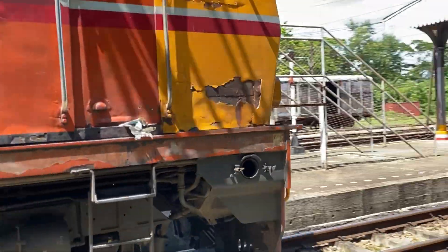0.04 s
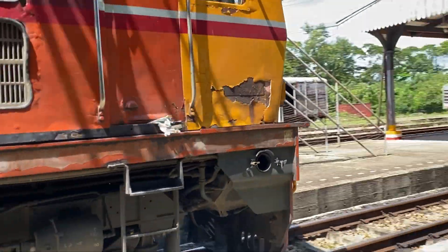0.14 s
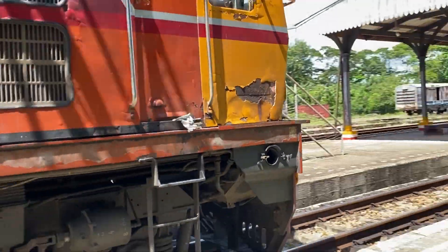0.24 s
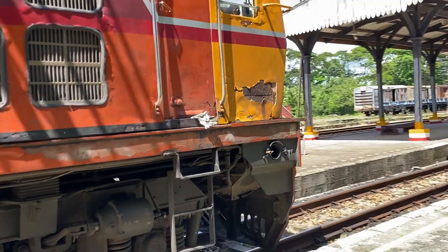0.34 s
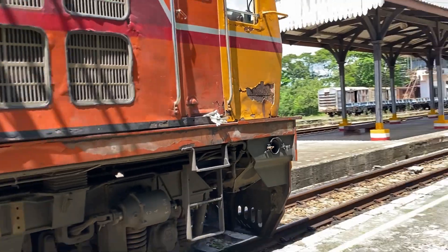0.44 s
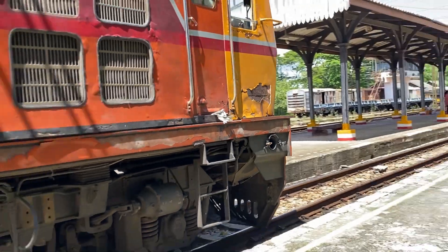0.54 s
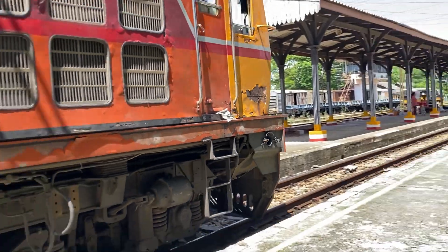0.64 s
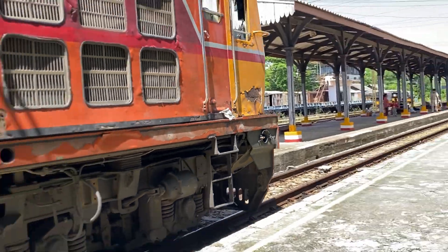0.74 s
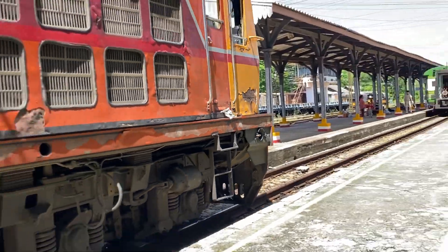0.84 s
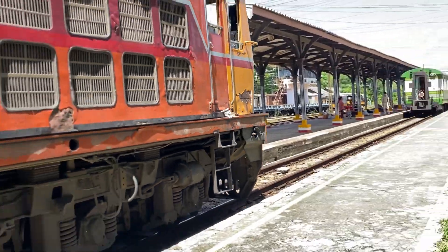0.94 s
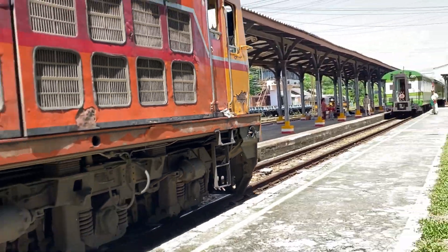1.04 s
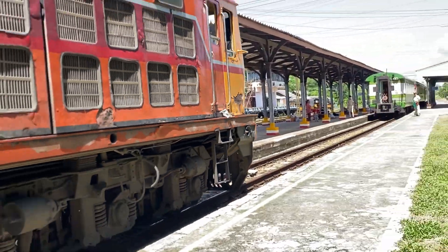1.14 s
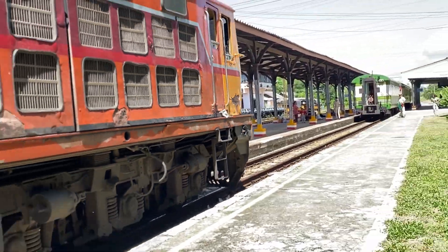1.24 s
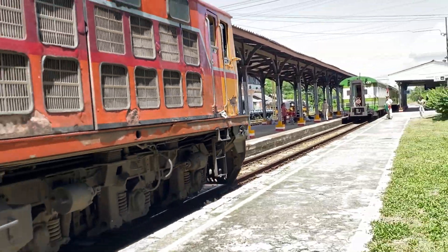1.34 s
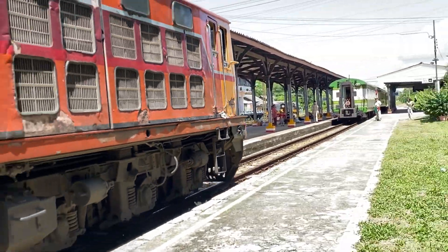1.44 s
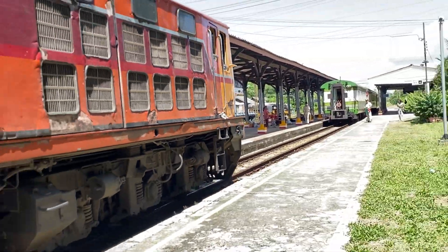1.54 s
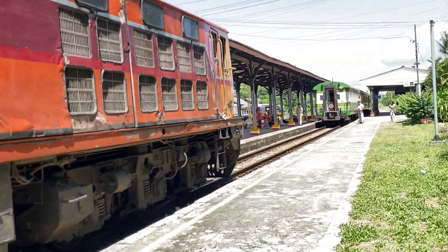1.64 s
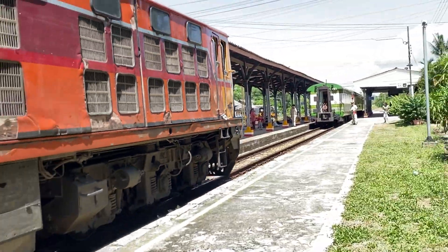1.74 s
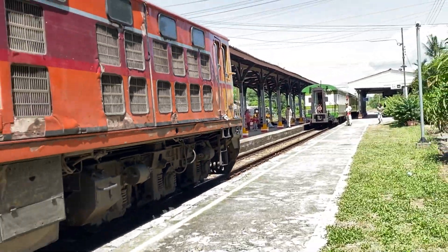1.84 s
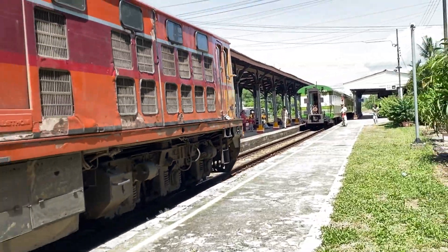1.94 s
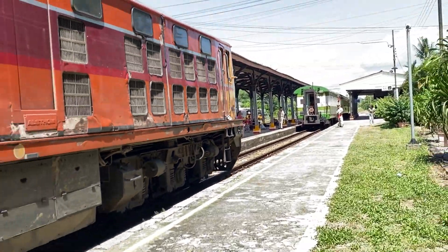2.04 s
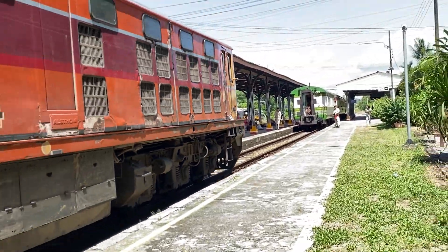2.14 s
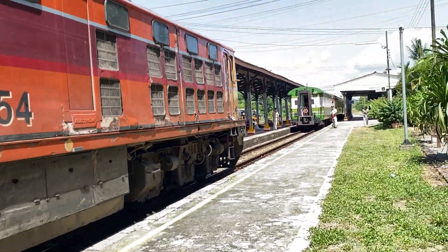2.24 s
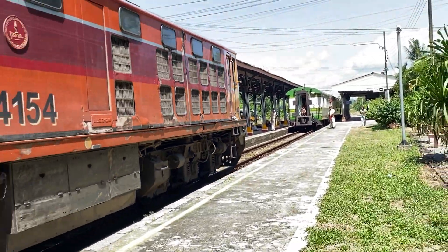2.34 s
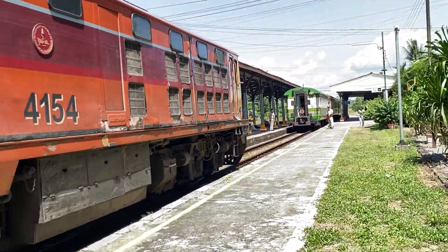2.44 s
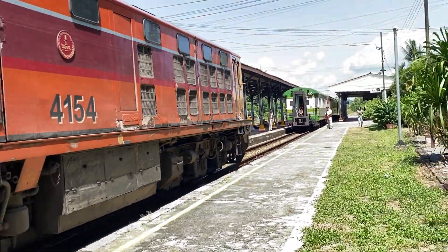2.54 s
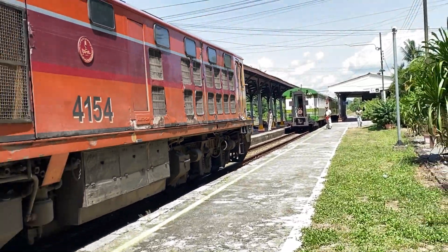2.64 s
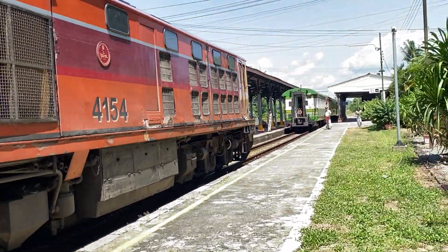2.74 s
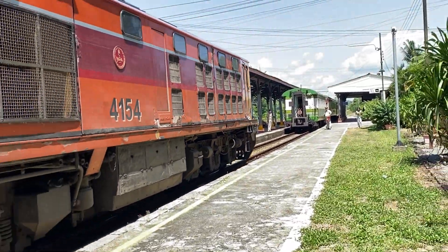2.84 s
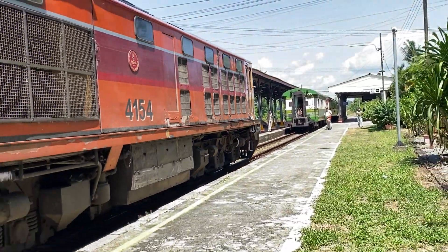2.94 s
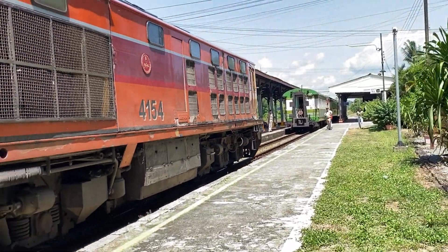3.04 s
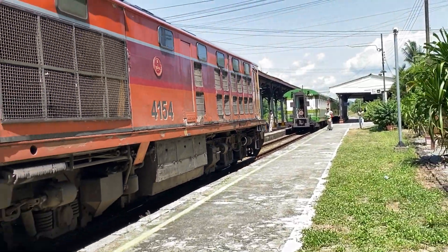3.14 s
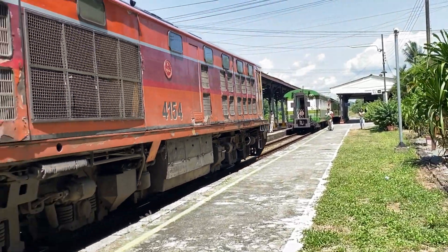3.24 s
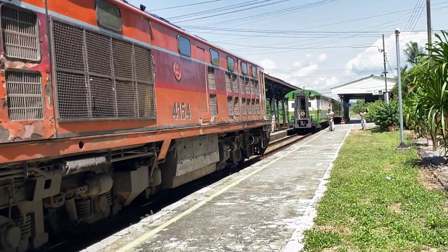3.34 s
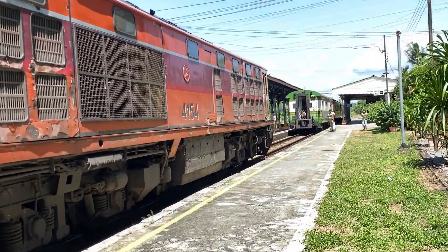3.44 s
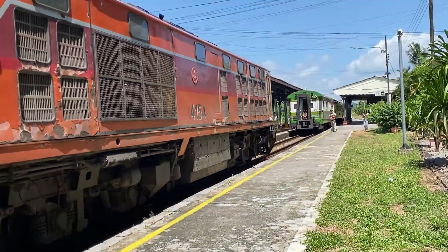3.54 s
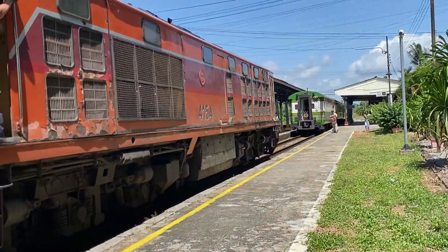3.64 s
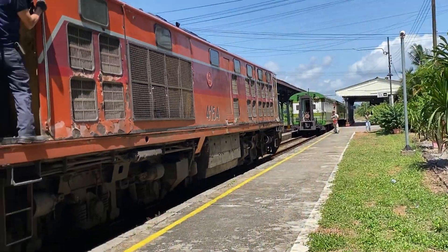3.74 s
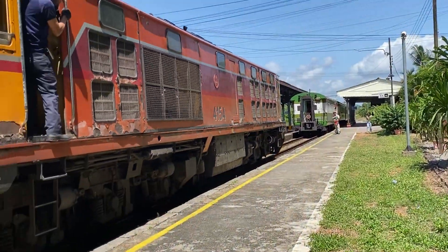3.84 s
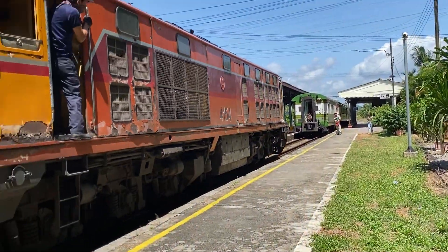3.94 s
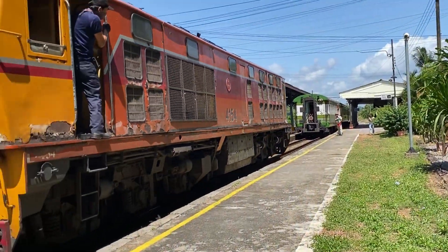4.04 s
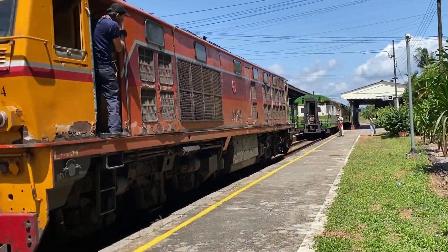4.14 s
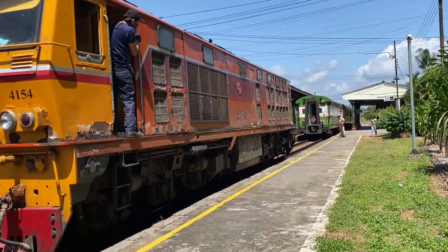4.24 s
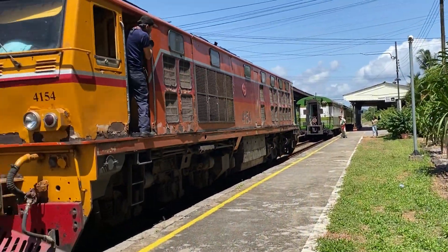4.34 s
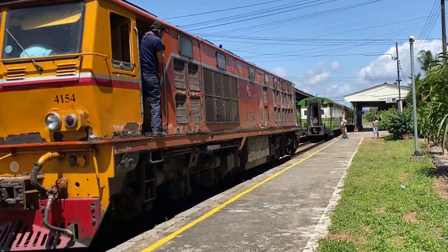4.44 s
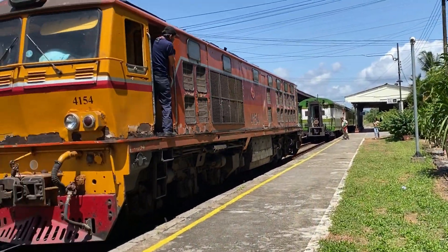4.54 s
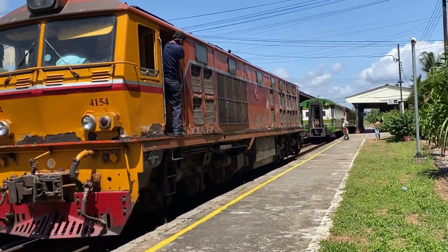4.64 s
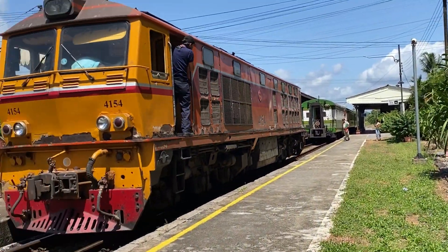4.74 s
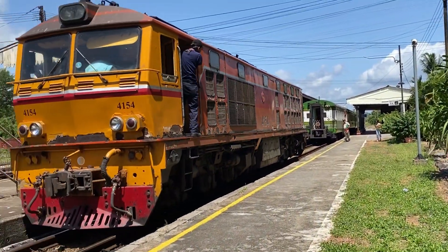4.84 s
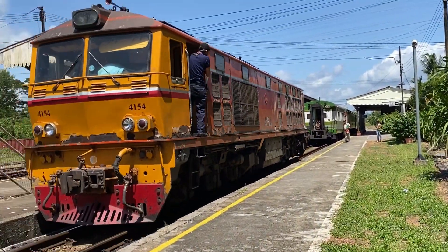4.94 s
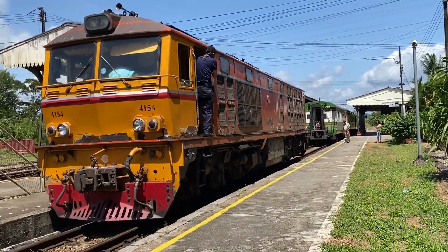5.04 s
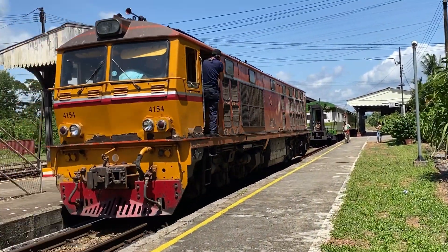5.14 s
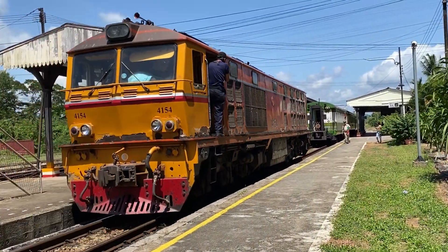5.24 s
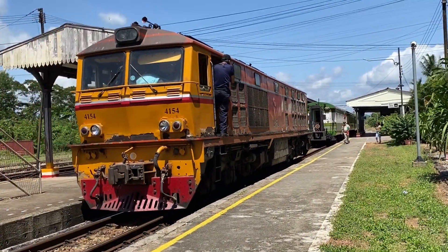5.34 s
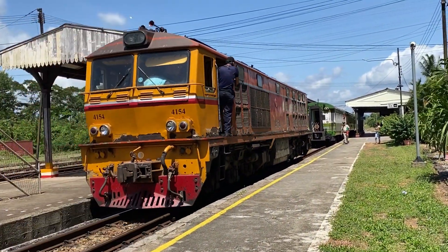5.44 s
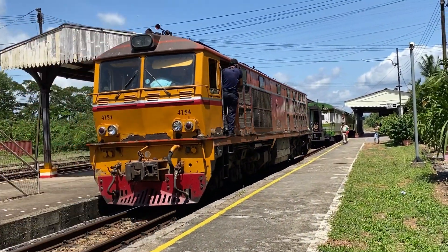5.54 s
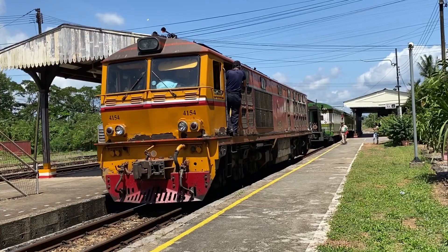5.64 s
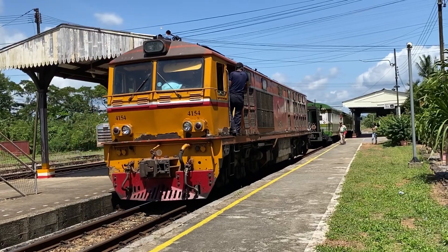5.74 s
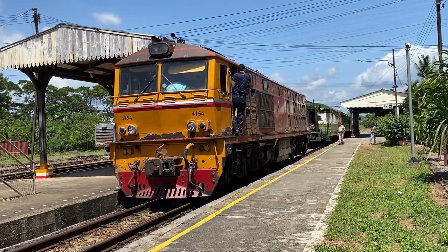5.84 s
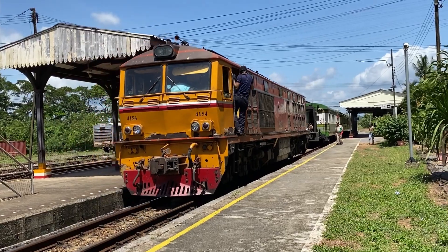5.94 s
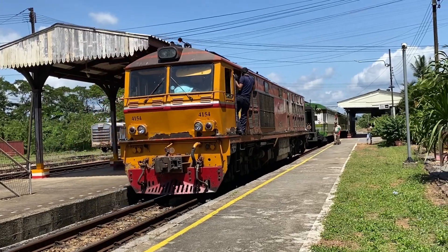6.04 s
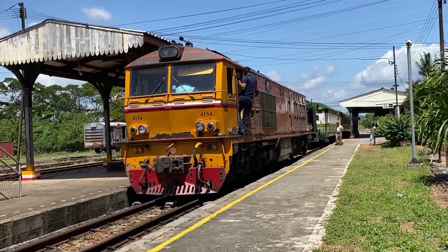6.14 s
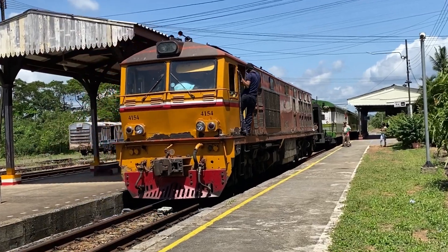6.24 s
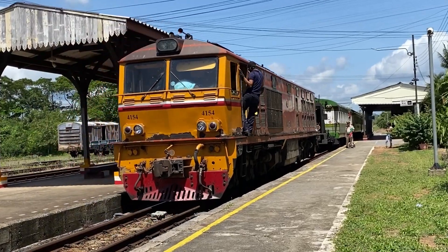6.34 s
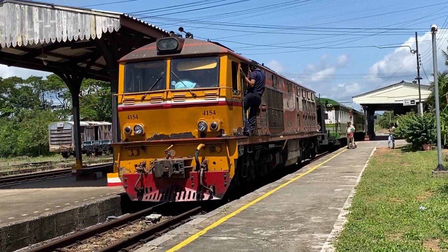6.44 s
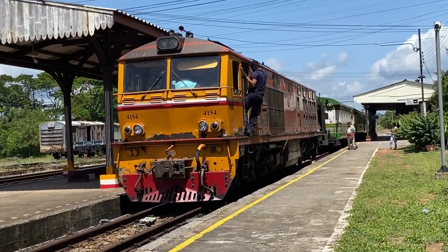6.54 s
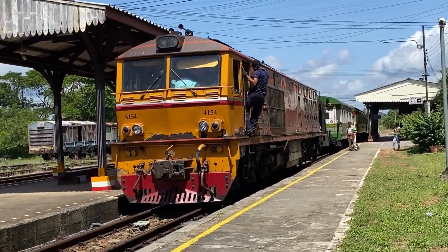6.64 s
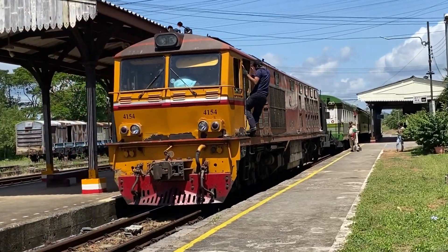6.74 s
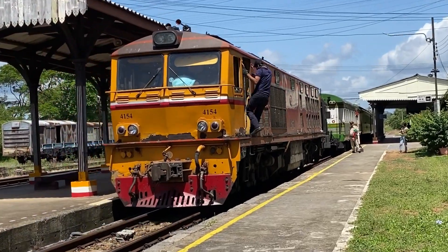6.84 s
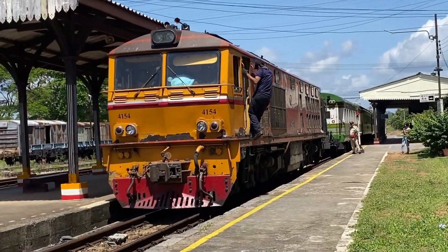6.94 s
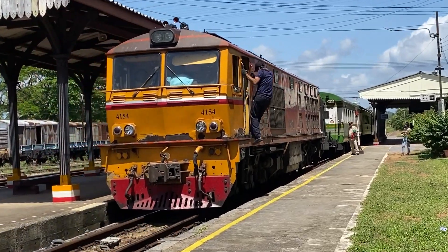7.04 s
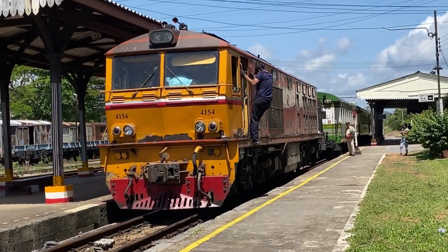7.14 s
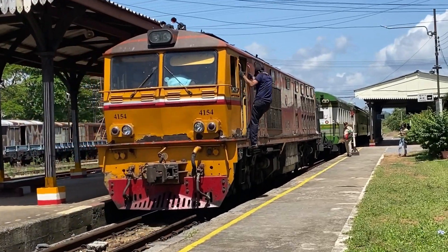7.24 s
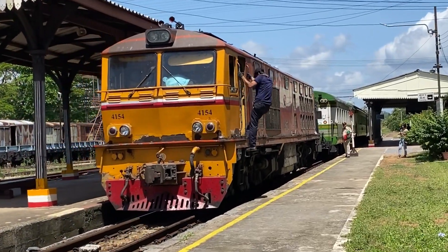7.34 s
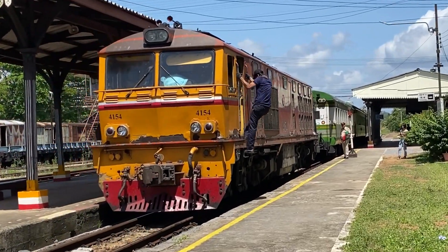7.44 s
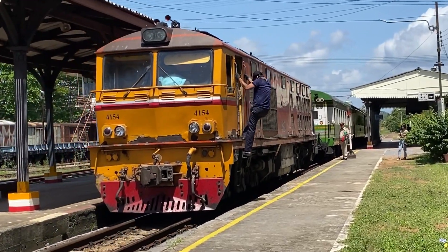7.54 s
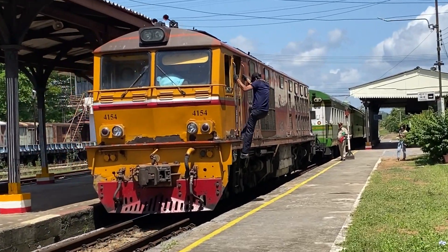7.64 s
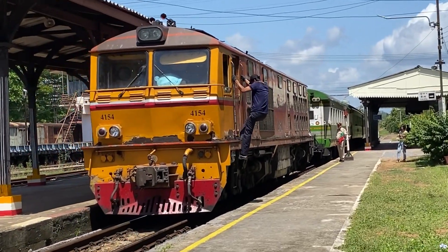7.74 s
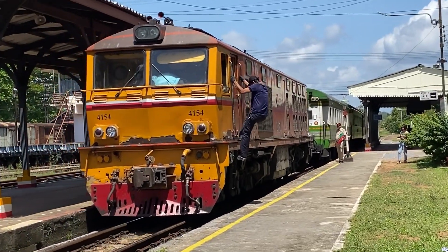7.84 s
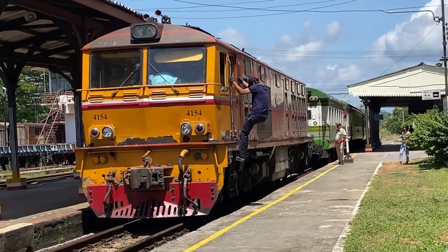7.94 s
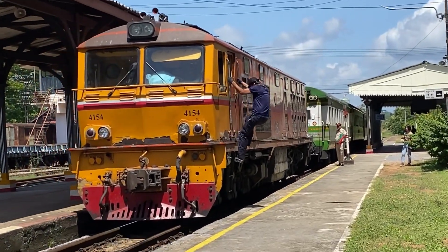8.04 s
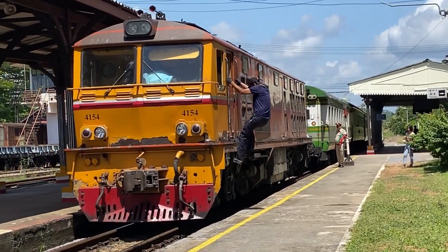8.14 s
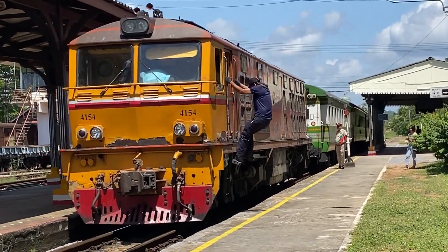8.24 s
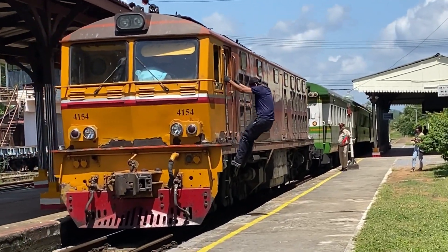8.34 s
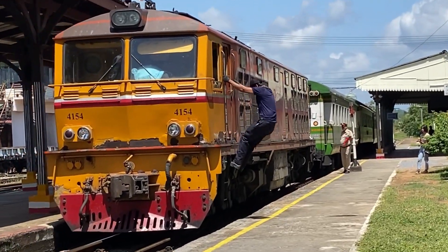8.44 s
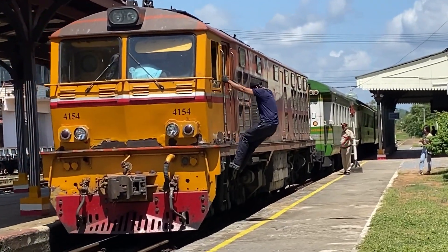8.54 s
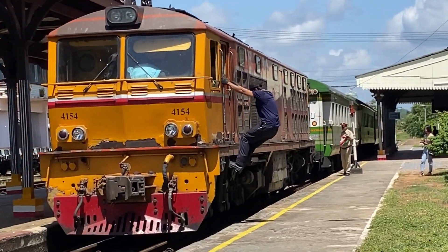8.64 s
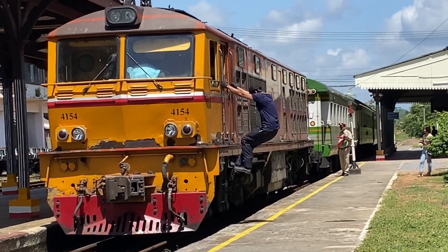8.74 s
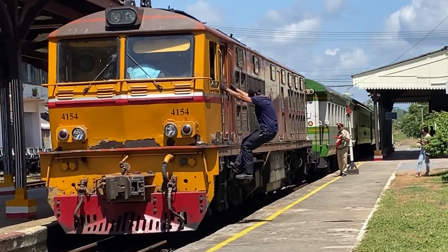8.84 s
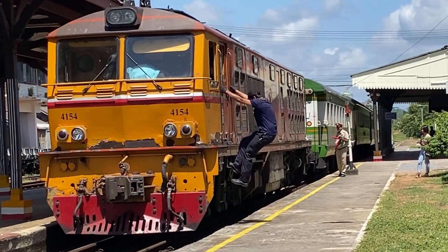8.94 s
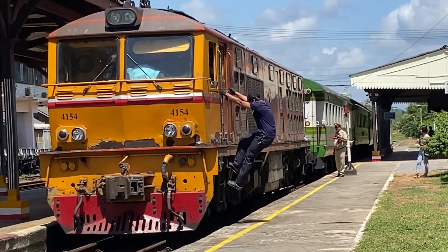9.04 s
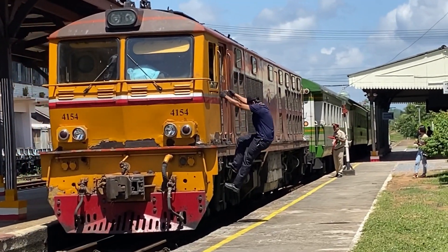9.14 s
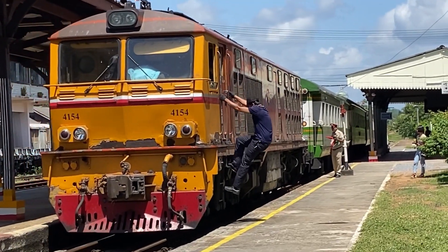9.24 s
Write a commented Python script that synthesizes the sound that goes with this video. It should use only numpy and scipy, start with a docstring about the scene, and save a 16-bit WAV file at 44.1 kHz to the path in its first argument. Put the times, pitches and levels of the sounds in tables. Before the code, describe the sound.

A stereo microphone beside the track catches loud engine rattle, low exhaust rumble and a rough, pulsing whine from the open side of a slow locomotive. Low brake groans break in, growing into a long rasping one with metal scraping. Then the clatter falls away; wheels hiss lightly, the engine mutters ahead, the brakes groan weakly again, and the running gear knocks in low thumps.

```python
"""A diesel locomotive rolls past close on the left along a platform, then creeps away, braking.
First its idling engine throbs, clatters and whines through the side grilles: repeated firings drive
noise-like rumble and panel drone, under rough sine tones. Brake blocks soon groan in stick-slip bouts and
scrape, exciting the wheel's resonances. Flanges brush the rail as friction noise; then, once the cab hides
the grilles, the running gear thuds as decaying low sines and a steel part ticks as decaying high modes."""
import sys
import numpy as np
from scipy import signal
from scipy.fft import rfft, irfft, next_fast_len
from scipy.io import wavfile
from scipy.ndimage import uniform_filter1d, map_coordinates

SR = 44100
rng = np.random.default_rng(int(sys.argv[2]) if len(sys.argv) > 2 else 0)


def transcribe(signal):
    """Save signal, clipped to [-1, 1], as a 16-bit WAV file at the path in sys.argv[1]."""
    frames = np.atleast_2d(signal).T
    limited = np.clip(frames, -1, 1)
    pcm = np.round(limited * 32767).astype(np.int16)
    wavfile.write(sys.argv[1], SR, pcm)


N = 409670
FIRING_HZ = 70.16  # mean rate of cylinder firings at idle

# Clatter of the engine as it passes and draws away; panels and boom follow it in part: (time [s], level [dB])
ENGINE_LEVEL = [(0, -21.5), (1.2, -20), (2.0, -21), (2.95, -24.5), (3.25, -29.5), (4.9, -32), (5.8, -34),
                (9.29, -34)]


def amp(db):
    """Decibels are twenty times the logarithm of an amplitude ratio."""
    return 10 ** (np.asarray(db) / 20)


def unit(x):
    """Normalization to a root-mean-square value of 1."""
    return x / np.sqrt(np.mean(x ** 2) + 1e-20)


def clock():
    """Sampled time: the instant of every sample, in seconds."""
    return np.arange(N) / SR


def along(points, hz):
    """Interpolation of (frequency [Hz], value) points on a logarithmic frequency axis."""
    f, v = np.transpose(points)
    return np.interp(np.log(hz + 1), np.log(f + 1), v)


def curves(rows):
    """Linear interpolation in time: one curve for each column after the time."""
    s, *cols = np.transpose(rows)
    return [np.interp(clock(), s, c) for c in cols]


def wobble(rate):
    """Band-limited random modulation: a smooth curve through `rate` random knots a second."""
    knots = rng.standard_normal(int(N * rate / SR) + 4)
    return map_coordinates(knots, [clock() * rate])


def turn(hz):
    """Phase is the time integral of angular frequency."""
    return 2 * np.pi * np.cumsum(hz) / SR


def filtered(x, response):
    """Linear filtering: multiplication of the spectrum by a complex response of frequency."""
    m = next_fast_len(N + SR // 2)
    return irfft(rfft(x, m) * response(np.fft.rfftfreq(m, 1 / SR)), m)[..., :N]


def coloured(x, spectrum):
    """Zero-phase spectral shaping by a (frequency [Hz], gain [dB]) curve."""
    return filtered(x, lambda hz: amp(along(spectrum, hz)))


def air(alike=None):
    """Partial coherence: white noise at two ports, made of a shared mid and an opposed side part."""
    if alike is None:
        # Likeness of the noise at the two ports: (frequency [Hz], correlation [1])
        alike = [(60, .96), (160, .89), (350, .93), (650, .78), (1000, .84), (1500, .66), (2200, .7),
                 (3200, .92), (7000, .84), (9000, .96), (10500, .62), (12200, .9), (14000, .65)]

    def mid_side(hz):
        angle = np.arccos(np.clip(along(alike, hz), -1, 1)) / 2
        return np.array([np.cos(angle), np.sin(angle)])

    mid, side = filtered(rng.standard_normal((2, N)), mid_side)
    return np.array([mid + side, mid - side])


def swell(s, length, fall=1):
    """Gaussian envelope: a rise to time s, then a fall that takes `fall` times as long."""
    t = (clock() - s) / length
    return np.exp(-2 * np.where(t < 0, t, t / fall) ** 2)


def patchy(x, depth_db):
    """Random time-frequency modulation, in patches of about 200 Hz by 60 ms."""
    z = signal.stft(x, nperseg=1024)[2]
    field = rng.standard_normal(z.shape[1:])
    field = uniform_filter1d(field, size=5, axis=0)
    field = uniform_filter1d(field, size=5, axis=1)
    return signal.istft(z * amp(depth_db * unit(field)), nperseg=1024)[1][:, :N]


def chirps(modes, life, spread_db, count):
    """Modal excitation: brief squeals at random moments, each near one (frequency, width, level) mode."""
    t = np.arange(SR // 25) / SR
    picked = rng.integers(len(modes), size=count)
    hz, width, db = np.array(modes)[picked].T[..., None]
    detune, strength = rng.standard_normal((2, count, 1))
    bell = np.sin(np.pi * np.clip(t / life, 0, 1)) ** 2
    level = np.sqrt(width) * amp(db + spread_db * strength)
    notes = level * bell * np.sin(2 * np.pi * (hz + .5 * width * detune) * t)
    at = rng.integers(N, size=(count, 1)) + np.arange(len(t))
    return unit(np.bincount(at.ravel(), notes.ravel(), N)[:N])


def beside():
    """Acoustic shadowing: near 1 beside the open grilles, falling towards 0 as the cab hides them."""
    cab_s, fade_s = 2.66, .26  # midpoint and time scale of the fall
    return 1 / (1 + np.exp(np.clip((clock() - cab_s) / fade_s, -30, 30)))


def firings(scatter_db):
    """Combustion as an impulse train: one impulse per firing, unsteady in rate and strength."""
    cycles = turn(FIRING_HZ * (1 + .015 * wobble(10))) / (2 * np.pi)
    at = np.flatnonzero(np.diff(np.floor(cycles)))
    train = np.zeros(N)
    train[at] = amp(scatter_db * rng.standard_normal(N)[at])
    return train


def machinery(train):
    """Amplitude-modulated noise: firings drum on the body panels and rattle the valve gear."""
    # Gain on the clatter's treble: (time [s], gain [dB])
    treble_gain = [(0, -1.5), (1.0, -1), (1.8, -4), (2.6, -2), (3.4, 1.5), (5.5, -2.5), (7.5, 1.5),
                   (9.29, -2)]
    # Panel drone beside the grilles and from the front: (frequency [Hz], relative spectral level [dB])
    body_near, body_far = [(180, -38), (240, -4), (295, 9), (335, 2), (370, 2.5), (430, -3.5), (500, -3),
                           (700, -47)], [(180, -27), (255, 2), (300, 2), (335, 2), (375, 2.5), (420, 1.5),
                                         (500, -5), (700, -49.5)]
    # Clatter beside the grilles and from the front: (frequency [Hz], relative spectral level [dB])
    clatter_near, clatter_far = [(300, -25), (520, 0), (750, -1), (920, -5), (1200, -5), (1450, -5),
                                 (1900, -12), (3000, -19), (4300, -21.5), (5300, -26), (7200, -26.5),
                                 (9000, -32), (11000, -33), (15000, -43)], [(300, -10), (480, 0), (620, -2.5), (1050, -3), (1250, -7),
                                               (1450, -7), (2000, -14), (2900, -19.5), (4200, -20.5),
                                               (5500, -27.5), (7000, -29), (9000, -40), (11500, -36),
                                               (15000, -40)]
    # Likeness at the two ports for the long, open side: (frequency [Hz], correlation [1])
    wide_likeness = [(300, 1), (600, 0.62), (1000, 0.66), (1500, 0.99), (2150, 0.77), (2800, 0.89),
                     (4000, 1), (7000, 1), (12000, 1)]
    treble_hz = 3020  # the treble filter passes half the amplitude here
    panel_db, panel_follows = -2.5, .83  # gain; dB per dB of the engine

    engine_db, treble_db = curves(ENGINE_LEVEL)[0], curves(treble_gain)[0]
    decay = np.exp(-clock()[:SR // 20] / .013)
    blows = unit(signal.fftconvolve(train, decay)[:N])
    pulsing = 1 + .1 * blows
    # square roots keep the summed power steady through the crossfade
    side, front = np.sqrt(beside()), np.sqrt(1 - beside())

    drumming = side * unit(coloured(air() * pulsing, body_near))
    drumming = drumming + front * unit(coloured(air() * pulsing, body_far))
    panels = drumming * amp(panel_db + panel_follows * engine_db + .73 * wobble(9))

    near = unit(coloured(air(wide_likeness) * pulsing, clatter_near))
    far = unit(coloured(air() * pulsing, clatter_far))
    clatter = patchy(side * near + front * far, depth_db=1.5)
    treble = filtered(clatter, lambda hz: hz ** 4 / (hz ** 4 + treble_hz ** 4))
    balanced = clatter - treble + treble * amp(treble_db)
    return panels + balanced * amp(engine_db + .8 * wobble(10))


def exhaust(train):
    """Pulsed flow and turbulence: puffs and gas rumble from the stack, with a boom under the frame."""
    # Low rumble: (time [s], level [dB])
    rumble_level = [(0, -17), (1.0, -15.5), (1.95, -18.5), (2.9, -20.5), (3.25, -25), (4.0, -25),
                    (4.5, -26), (5.0, -22.5), (6.2, -26), (7.1, -23.5), (7.3, -29.5), (7.45, -19.5),
                    (7.8, -25.5), (8.1, -28), (8.3, -26), (8.42, -41.5), (8.98, -31), (9.17, -25.5)]
    # Swells of the boom: (time of peak [s], length [s], level [dB])
    boom_surges = [(1.803, 0.34, -23.5), (2.402, 0.88, -22.5), (2.99, 0.071, -19.5), (4.905, 0.056, -19.5),
                   (7.723, 0.076, -24), (7.953, 0.069, -24.5), (8.24, 0.12, -26), (9.145, .11, -21.5)]
    # Exhaust gas and boom: (frequency [Hz], relative spectral level [dB])
    gas_spectrum, boom_spectrum = [(15, -60), (25, -39), (38, -6.5), (52, 0), (70, 5.5), (100, 2),
                                   (130, -6), (180, -5), (300, -60)], [(80, -20), (115, 2), (150, -3), (190, -2.5),
                                                    (240, -1.5), (275, -1.5), (340, -5.5), (500, -107)]
    # gain; dB per dB of the engine; dB per dB of the rumble
    boom_db, boom_follows, boom_sways = -7, .46, .24

    rumble_db, engine_db = curves(rumble_level)[0], curves(ENGINE_LEVEL)[0]
    gas = unit(coloured(air(), gas_spectrum)) + .26 * unit(coloured(train, gas_spectrum))
    rumble = unit(gas * amp(.41 * wobble(19))) * amp(rumble_db)

    steady = amp(boom_db + boom_follows * engine_db + boom_sways * rumble_db + 1.4 * wobble(8))
    surges = sum(amp(db) * swell(s, length) for s, length, db in boom_surges)
    boom = unit(coloured(air([(100, .96), (250, .97)]), boom_spectrum))
    return rumble + boom * np.hypot(steady, surges)  # independent swells add in power


def hum():
    """Periodic forces radiate tones: the exhaust's firing lines and the unsteady song of fans and gears."""
    # Exhaust drone an octave above the firing rate: (time [s], level [dB])
    drone_level = [(0, -24), (1.9, -22.5), (2.5, -58), (3.5, -29.5), (4.4, -30.5), (6.5, -25), (8.5, -35.5),
                   (8.9, -26)]
    # Fans and gears: (frequency [Hz], level beside the grilles [dB], level from the front [dB])
    hum_lines = [(248, -29, -45), (366, -27, -46), (555, -33.5, -55), (702, -34, -50), (1467, -41, -48.5),
                 (1735, -47, -53)]

    near = beside()
    firing = turn(FIRING_HZ * (1 + .014 * wobble(25)))
    drone = amp(curves(drone_level)[0] + 1.6 * wobble(12)) * np.sin(2 * firing)
    throb = near * amp(-25 + 3.5 * wobble(20)) * np.sin(firing + .8 * wobble(25))
    lines = np.zeros(N)
    for hz, near_db, far_db in hum_lines:
        fading_db = 1.1 * wobble(2) + 2.4 * wobble(14)
        pitch = hz + 6 * wobble(70)
        lines += amp(near * near_db + (1 - near) * far_db + fading_db) * np.sin(turn(pitch))
    return drone + throb + lines


def whine():
    """Frequency modulation: rough partials glint apart, their pitch kicks, and a reflection widens them."""
    # Direct whine flickering through the passing louvres: (time [s], level [dB])
    whine_level = [(0, -41), (.25, -36), (.33, -33), (.42, -38), (.48, -34.5), (.6, -31.5), (.67, -28),
                   (.78, -31), (.83, -31.5), (.9, -29), (1.04, -29.5), (1.12, -37), (1.18, -28.5),
                   (1.27, -33.5), (1.35, -42), (1.44, -33), (1.49, -46), (1.55, -33), (1.61, -42),
                   (2.5, -50), (3.4, -53), (6.5, -55), (9.29, -54)]
    kick_hz, first_kick_s, kick_depth = 5.27, .1, .04  # rate; time; share of the pitch
    rise_s, fall_s = .028, .02

    since = (clock() - first_kick_s) % (1 / kick_hz)
    until = 1 / kick_hz - since
    kick = np.exp(-(since / fall_s) ** 2) + np.exp(-(until / rise_s) ** 2)
    phase = turn(2384 * (1 + kick_depth * kick + .005 * wobble(35) + .018 * wobble(500)))
    tone = np.zeros(N)
    for partial, db in [(1, 0), (2, -12), (3, -18)]:
        glint = unit(amp(2.4 * wobble(40) + 2.4 * wobble(140)))
        tone += amp(db) * glint * np.sin(partial * phase)
    direct = unit(tone) * amp(curves(whine_level)[0])
    reflection = .45 * np.pad(direct, (round(.012 * SR), 0))[:N]  # 12 ms late
    return np.array([direct + reflection, direct - reflection])


def gear():
    """Tooth-mesh excitation: a thin, clear tone that fades and returns as the locomotive moves."""
    # Gear tone: (time [s], level [dB])
    gear_level = [(0, -37), (.9, -31), (1.55, -41), (2.4, -29), (2.95, -38.5), (3.4, -33.5), (3.8, -44),
                  (4.15, -38), (4.9, -51), (6.2, -44), (6.85, -42), (7.5, -53), (8.1, -45), (9.29, -46)]
    pitch = 1066.5 + 2.5 * wobble(12)
    flutter_db = 1.1 * wobble(15)
    return amp(curves(gear_level)[0] + flutter_db) * np.sin(turn(pitch))


def groans():
    """Stick-slip self-oscillation: a block groans, ragged when loose; the engine shakes it and it rings on."""
    # One curve per bout, before shake and roughness: (time [s], pitch [Hz], level [dB])
    groan_bouts = [
        [(1.39, 286, -32), (1.44, 283, -11), (1.52, 286, -15), (1.56, 290, -32)],
        [(1.82, 296, -31), (1.86, 292, -8.5), (1.9, 298, -28)],
        [(2.0, 292, -26.5), (2.06, 286, -9), (2.1, 292, -12), (2.135, 298, -5), (2.18, 305, -12),
         (2.27, 311, -12), (2.305, 306, -25)],
        [(2.3, 296, -19.5), (2.322, 293, -8), (2.41, 294, -6), (2.458, 296, -16.5), (2.49, 298, -6),
         (2.53, 294, -12), (2.58, 292, -28)],
        [(2.775, 310, -24.5), (2.81, 314, -11), (2.855, 313, -6.5), (2.935, 310, -9.5), (2.968, 307, -15),
         (3.0, 311, -8.5), (3.06, 311, -7.5), (3.11, 305, -8), (3.16, 301, -9), (3.22, 304, -21.5),
         (3.5, 300, -23.5), (3.75, 294, -26.5), (4.1, 298, -27)],
        [(6.41, 298, -30), (6.47, 297, -19.5), (6.5, 295, -26), (6.56, 303, -20), (6.61, 307, -16.5),
         (6.635, 308, -28), (6.685, 308, -15.5), (6.73, 308, -17.5), (6.77, 306, -34)],
        [(7.9, 310, -32), (7.95, 305, -21.5), (8.02, 300, -36)],
        [(8.52, 310, -30), (8.57, 310, -17), (8.6, 308, -40)],
    ]
    edge_s = .018  # taking hold and letting go
    grip_db, slip_range_db, slip_jitter = -16, 9, .04  # loosening level; its range; pitch scatter when loose
    shake_depth, rough_db = .28, 1.3

    out = np.zeros(N)
    for bout in groan_bouts:
        hz, db = curves(bout)
        gate = np.clip(np.minimum(clock() - bout[0][0], bout[-1][0] - clock()) / edge_s, 0, 1)
        loose = np.clip((grip_db - db) / slip_range_db, 0, 1)
        phase = turn(hz * (1 + .016 * wobble(130) + slip_jitter * loose * wobble(60)))
        out += gate * amp(db) * (np.sin(phase) + amp(-27) * np.sin(2 * phase))
    shake = np.sin(turn(FIRING_HZ * (1 + .08 * wobble(30))))
    out *= (1 + shake_depth * shake) * amp(rough_db * wobble(70))
    tail = rng.standard_normal(SR // 2) * amp(-60 * clock()[:SR // 2] / .7)  # falls 60 dB in 0.7 s
    return out + .15 * signal.fftconvolve(out, tail / np.linalg.norm(tail))[:N]


def scrape():
    """Dry friction is broadband: grit hisses under the blocks, excites the wheel's modes and squeals."""
    # Bites of a block: (time of hardest bite [s], build-up [s], wheel ring level [dB], grit level [dB])
    block_bites = [(2.33, .07, -37, -34), (2.885, 0.14, -25.5, -33), (3.0, 0.078, -23.5, -29.5),
                   (3.07, 0.057, -28, -28.5), (3.115, 0.084, -25.5, -29.5), (4.41, .06, -50, -39),
                   (6.49, 0.29, -41.5, -39), (6.65, 0.031, -43, -41), (6.685, 0.043, -40, -38.5),
                   (7.262, 0.03, -48, -38), (7.32, 0.085, -55, -42.5), (7.56, 0.27, -62, -54),
                   (7.96, 0.11, -51, -43), (8.18, 0.093, -45, -49)]
    # Resonances of the scraped wheel: (frequency [Hz], width [Hz], relative level [dB])
    wheel_modes = [(980, 100, 0), (1170, 80, 6), (1290, 80, 2), (1530, 90, -1.5), (1790, 110, 0),
                   (2130, 120, -5.5), (3110, 220, -13), (3840, 300, -13), (5700, 400, -16),
                   (7000, 350, -17), (7820, 300, -13), (9650, 400, -14.5), (10450, 400, -20),
                   (12400, 350, -18.5), (14000, 500, -24)]
    grit_spectrum = [(500, -18), (1000, 6), (2200, -1.5), (4200, -8.5), (6000, -10.5), (15000, -30.5)]
    let_go = .56  # a scrape dies in this share of its build-up
    drag_db = -49  # light rubbing that comes in as the cab hides the grilles
    squeal_db, scatter_db = -4.5, 1.4  # squeals against the noise-driven ring; unevenness of the friction

    def wheel(f):
        total = 0
        for k, (centre, width, db) in enumerate(wheel_modes):
            resonance = 1j * f * width / (centre * centre - f * f + 1j * f * width)
            total = total + (-1) ** k * amp(db) * resonance  # neighbours alternate in sign
        return total

    grain = amp(scatter_db * wobble(400))
    squeals = chirps(wheel_modes, life=.028, spread_db=2.5, count=3500)
    ring = unit(unit(filtered(air() * grain, wheel)) + amp(squeal_db) * squeals)
    grit = unit(coloured(air() * grain, grit_spectrum))
    bites = np.zeros((2, N))
    for s, build, ring_db, grit_db in block_bites:
        bites += swell(s, build, let_go) * (amp(ring_db) * ring + amp(grit_db) * grit)
    drag = amp(drag_db) * (1 - beside()) * ring
    return (bites + drag) * amp(1.6 * wobble(22))


def flanges():
    """Sliding contact radiates friction noise: a hiss on the rail and swishes full of tiny squeals."""
    # Hiss of the wheels, rising and then fading as the locomotive slows: (time [s], level [dB])
    rolling_level = [(0, -79), (2.5, -67), (3.4, -51.5), (4.4, -52.5), (5.3, -60.5), (6.3, -58), (7.6, -76),
                     (9.29, -77)]
    # Flanges brushing the rail: (time of peak [s], length [s], level [dB])
    rail_brushes = [(2.35, .1, -43), (2.536, 0.051, -41), (2.65, 0.11, -42), (3.31, 0.14, -43),
                    (3.433, .04, -50), (3.632, 0.05, -52), (4.093, 0.16, -50.5), (4.413, .06, -51),
                    (4.55, 0.07, -56), (4.703, 0.063, -55), (4.907, .06, -48), (5.01, 0.07, -48),
                    (6.03, .1, -62)]
    # Resonances of a flange against the rail: (frequency [Hz], width [Hz], relative level [dB])
    flange_modes = [(3850, 120, -4), (5850, 250, -3), (6150, 250, 0), (6450, 250, -5), (6850, 250, -1),
                    (11850, 500, -13)]
    # Friction hiss: (frequency [Hz], relative spectral level [dB])
    hiss_spectrum = [(1500, -25), (3000, -10), (4200, -7), (5300, -9), (6050, 1), (6450, -3), (6850, 1),
                     (7800, -7), (8700, -9), (9600, -4.5), (10800, -13), (11900, -12), (15000, -21)]

    hiss = unit(coloured(air(), hiss_spectrum))
    swish = unit(hiss + .9 * chirps(flange_modes, life=.022, spread_db=2.8, count=3500))
    brushing = sum(amp(db) * swell(s, length) for s, length, db in rail_brushes)
    flutter = amp(1.3 * wobble(50))
    return (hiss * amp(curves(rolling_level)[0]) + swish * brushing) * flutter


def squeaks():
    """Friction-driven vibration: dry pins and wheels in the bogies give thin, rough notes."""
    # Squeaks of the running gear: (time of peak [s], length [s], pitch [Hz], level [dB])
    squeak_notes = [(2.66, .04, 6100, -44), (3.29, .1, 3850, -48), (3.34, .04, 6150, -44),
                    (3.41, .06, 375, -26), (5.035, .06, 3810, -41.5), (5.03, .05, 5780, -51),
                    (6.52, .16, 935, -40), (6.67, .03, 5700, -47), (8.86, .03, 4400, -51)]
    waver = 1 + .007 * wobble(660)
    return sum(amp(db) * swell(s, length) * np.sin(turn(hz * waver)) for s, length, hz, db in squeak_notes)


def thuds():
    """Impulse response of a heavy, damped mass: a few low cycles with a puff of rumble."""
    # Jolts of the running gear, level before onset and decay: (time [s], pitch [Hz], level [dB])
    jolts = [(3.39, 98, -8), (4.034, 95, -11), (4.911, 86.5, -14), (5.549, 116, -10), (5.909, 119, -17),
             (6.096, 75.4, -13.5), (7.4, 62, -11.5), (7.498, 58, -9.5), (7.569, 72, -8), (7.69, 71, -9),
             (7.749, 92, -4.5), (7.789, 62, -7), (8.152, 183, -13.5), (8.288, 128, -15.5), (8.559, 83, -19),
             (9.148, 100, -15.5)]
    out, t = np.zeros(N + SR), np.arange(SR // 4) / SR
    band = signal.butter(2, [60, 330], "band", fs=SR, output="sos")
    onset = 1 - np.exp(-t / .0039)
    for s, hz, db in jolts:
        push = np.sin(2 * np.pi * hz * t)
        puff = unit(signal.sosfilt(band, rng.standard_normal(len(t))))
        decay = amp(db - 60 * t / .15)  # falls 60 dB in 0.15 s
        out[round(s * SR):][:len(t)] += decay * onset * (push + .33 * puff)
    return out[:N]


def ticks():
    """Free modal decay: a small steel part snaps and rings very high."""
    # Sharp ticks: (time [s], level [dB])
    snaps = [(6.262, -32), (6.272, -32)]
    # Modes of the steel part: (frequency [Hz], relative level [dB], time to fall 60 dB [s])
    steel_modes = [(6400, -12, .04), (9960, 0, .13), (10120, -4, .08), (11300, -10, .05), (12900, -14, .05),
                   (14200, -15, .05)]
    out, t = np.zeros(N + SR), np.arange(SR // 4) / SR
    for s, db in snaps:
        ring = sum(amp(level - 60 * t / t60) * np.sin(2 * np.pi * hz * t) for hz, level, t60 in steel_modes)
        crack = .4 * amp(-60 * t / .09) * np.diff(rng.standard_normal(len(t) + 1))
        out[round(s * SR):][:len(t)] += amp(db) * (ring + crack)
    return out[:N]


def scene():
    """Localization by level and phase: the locomotive starts close on the left and draws to the centre."""
    # Left-right balance close on the left and from the front: (frequency [Hz], level difference [dB])
    close_balance, front_balance = [(60, -1), (200, 2.5), (650, 5.5), (1300, .5), (4400, -1), (12000, -0.5)], [(480, -0.5), (720, -4.5), (1000, 0), (1300, -4.5),
                                                   (1700, -1.5), (2100, 0), (3000, 0.3), (12000, -2)]
    # Phase by which the left port leads, close and in front: (frequency [Hz], phase [rad])
    close_lead, front_lead = [(100, 0.15), (300, 0.36), (550, 0.58), (1100, 1.17), (1380, 1.24),
                              (1900, 1.48), (2200, 0.49), (3000, -.1), (6000, -0.13)], [(150, -0.038), (350, -0.15), (570, 0.0021),
                                                  (760, -0.0086), (1280, -.5), (1500, 0.46), (1800, -0.027),
                                                  (2100, 0.042), (2600, -0.059)]

    train = firings(scatter_db=9.5)
    loco = machinery(train) + exhaust(train) + hum() + whine() + gear()
    loco = loco + groans() + scrape() + flanges() + squeaks() + thuds() + ticks()
    sides = np.array([[.5], [-.5]])  # each port takes half the difference

    def placed(balance, lead):
        def response(hz):
            return amp(sides * along(balance, hz)) * np.exp(1j * sides * along(lead, hz))
        return filtered(loco, response)

    return beside() * placed(close_balance, close_lead) + (1 - beside()) * placed(front_balance, front_lead)


def record(dry):
    """Phase shift between the two channels, soft saturation of the peaks, and a limited band."""
    # Phase by which the left channel leads: (frequency [Hz], phase [rad])
    port_lead = [(100, .12), (1100, .25), (1600, .7), (3100, -.3), (5600, -.8), (6800, -.4), (7400, 1.8),
                 (8400, 3), (9500, 3.3), (11500, 6), (13000, 6.4), (15000, 9.3)]
    top_hz, low_cut_hz = 14700, 22
    sides = np.array([[.5], [-.5]])
    ports = filtered(dry, lambda hz: np.exp(1j * sides * along(port_lead, hz)))
    rounded = ports / (1 + np.abs(ports / .95) ** 8) ** (1 / 8)
    return filtered(rounded, lambda hz: (hz < top_hz) * hz ** 4 / (hz ** 4 + low_cut_hz ** 4))


dry = scene()
out = record(dry)
transcribe(out)
```